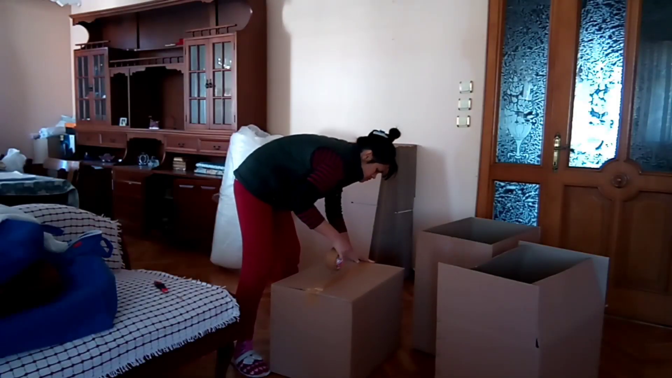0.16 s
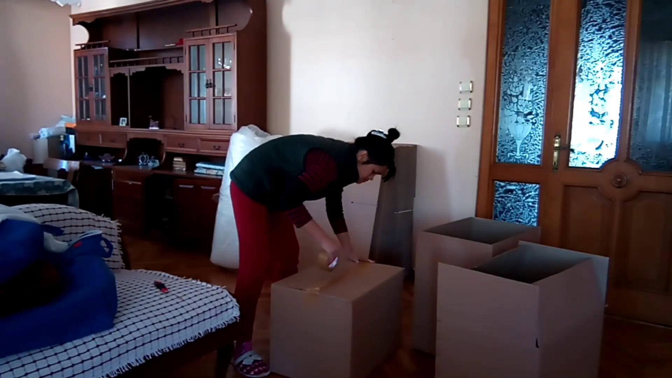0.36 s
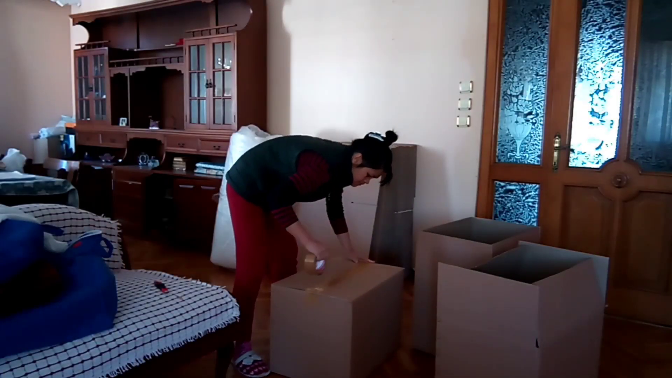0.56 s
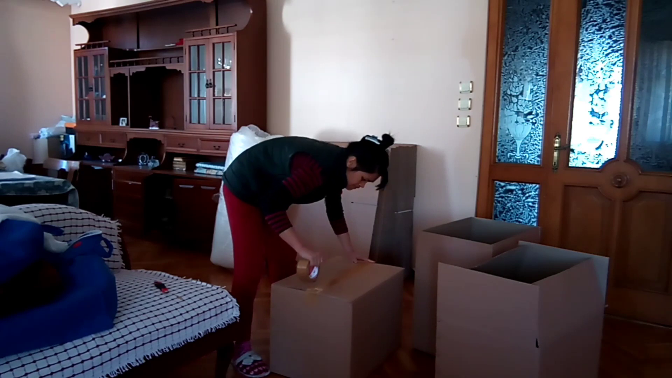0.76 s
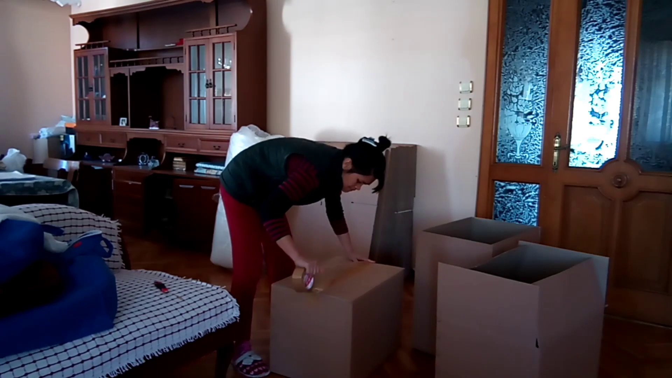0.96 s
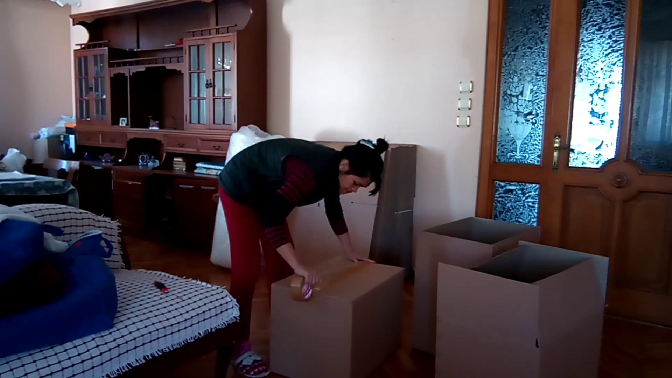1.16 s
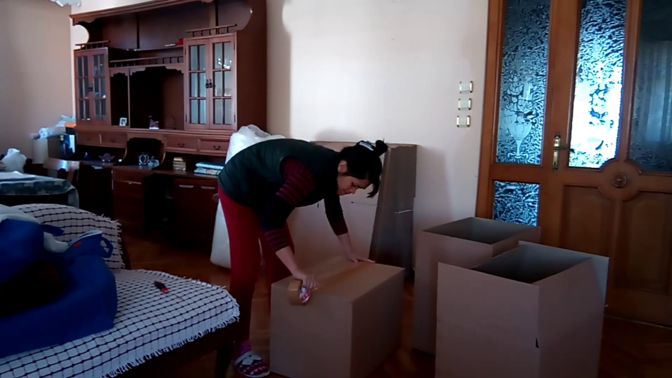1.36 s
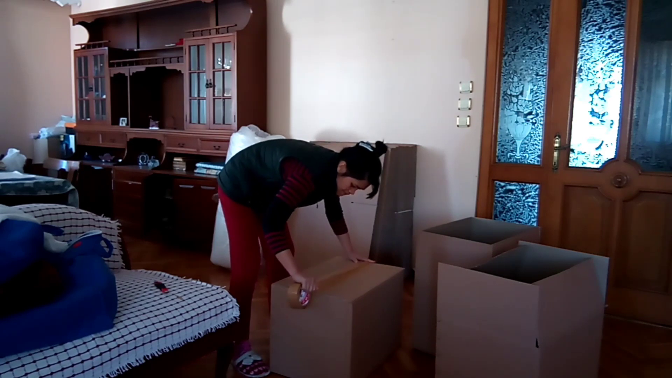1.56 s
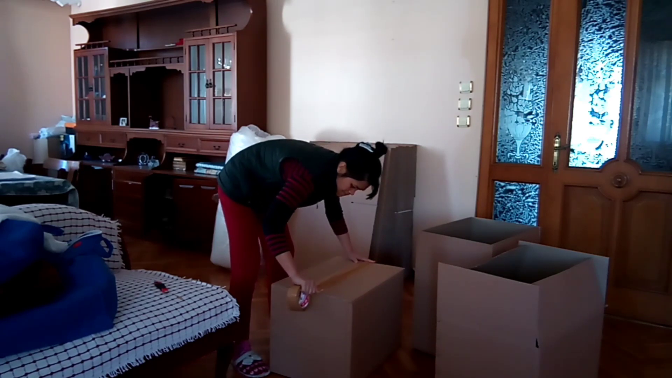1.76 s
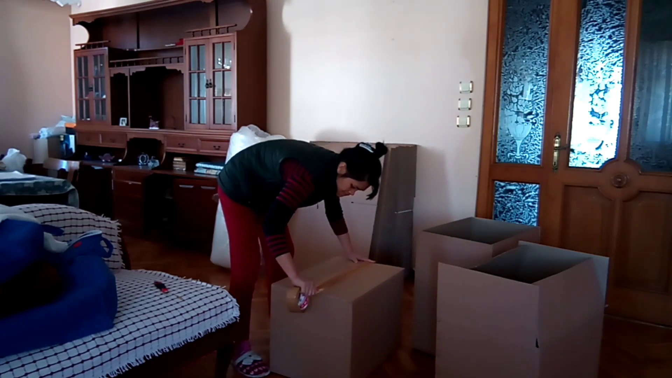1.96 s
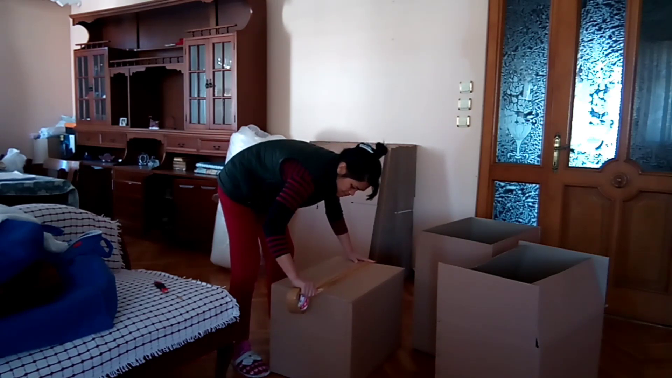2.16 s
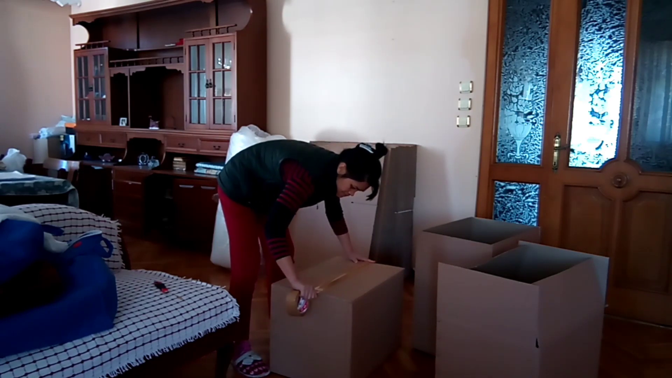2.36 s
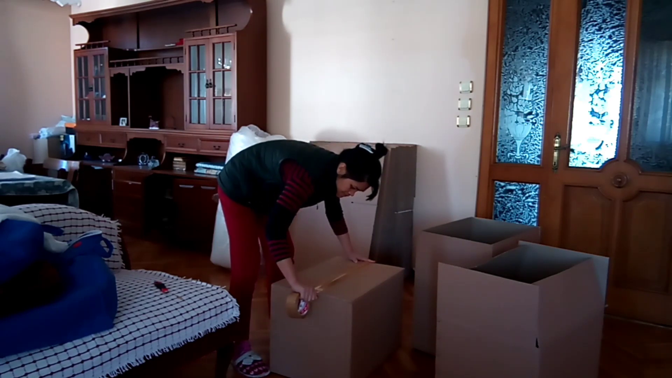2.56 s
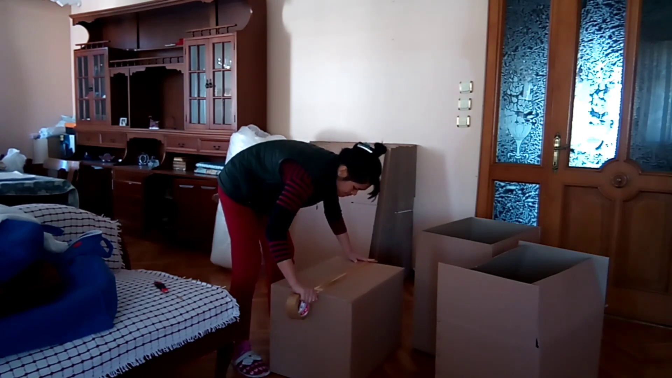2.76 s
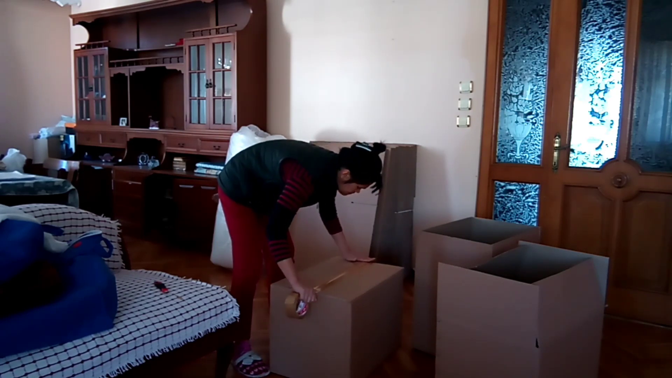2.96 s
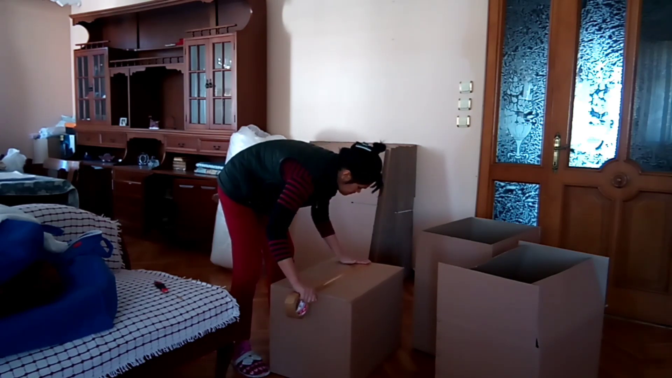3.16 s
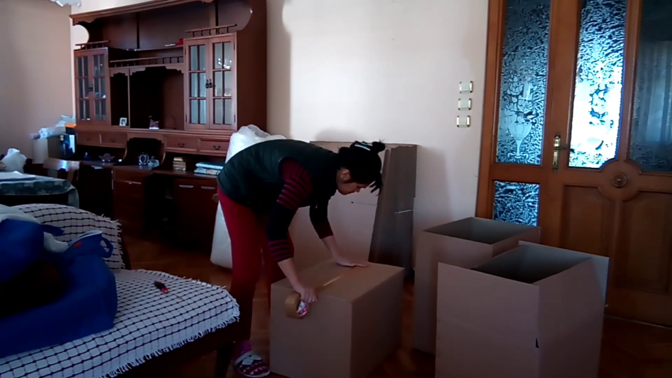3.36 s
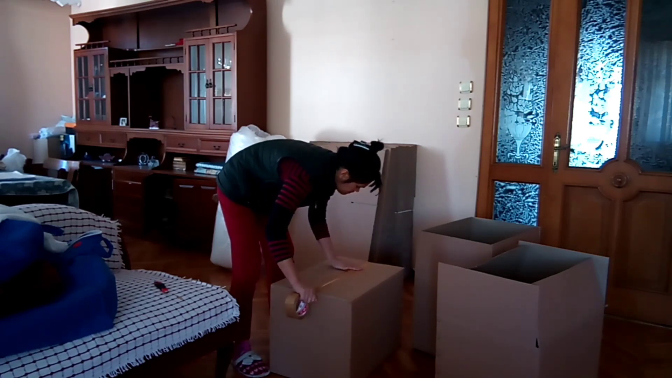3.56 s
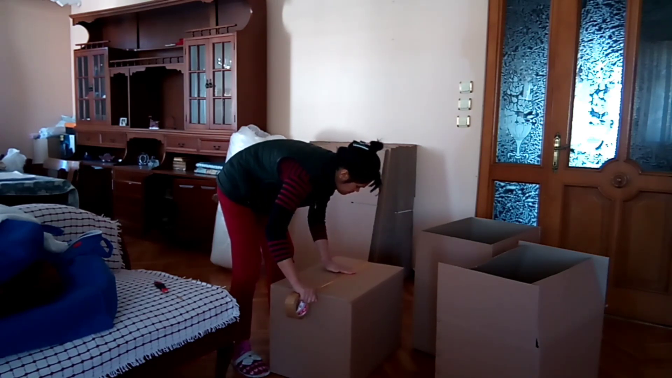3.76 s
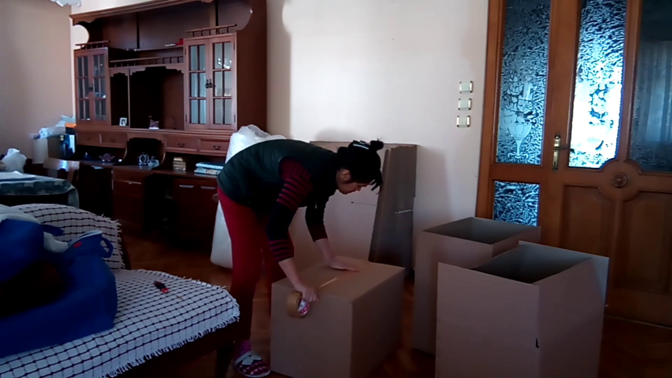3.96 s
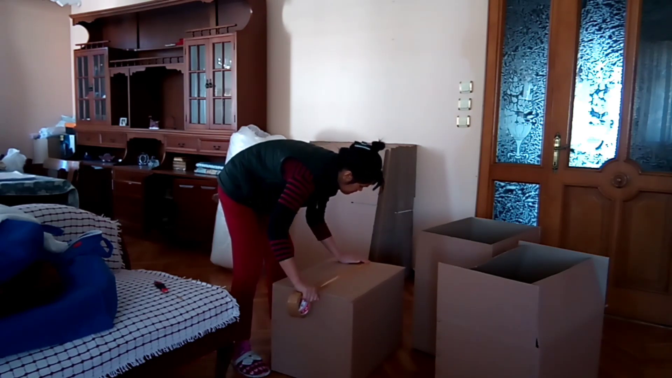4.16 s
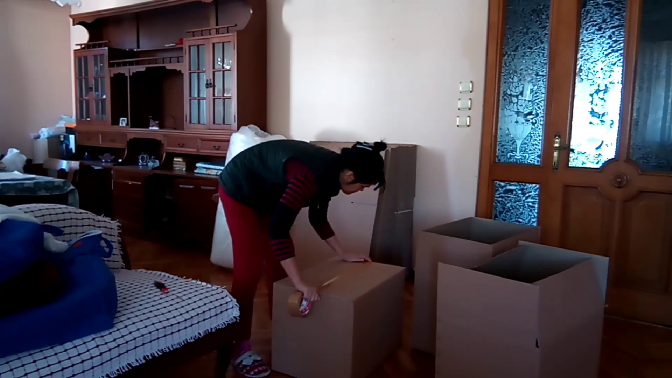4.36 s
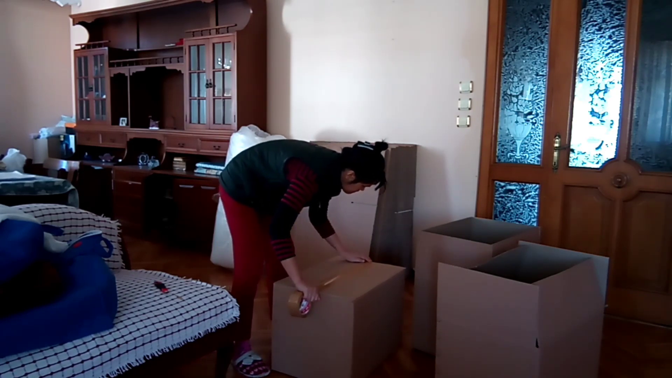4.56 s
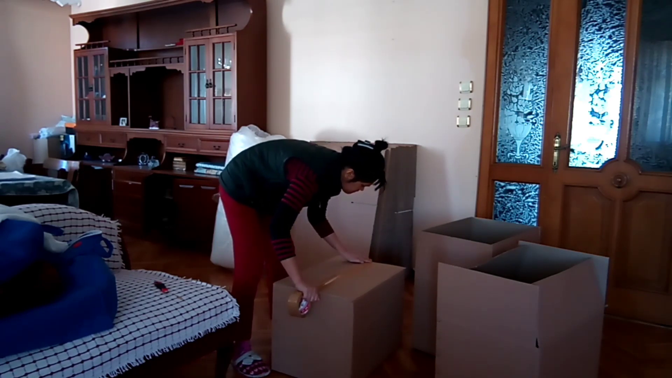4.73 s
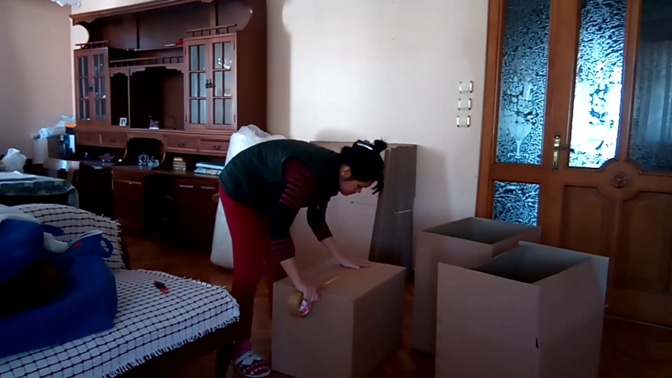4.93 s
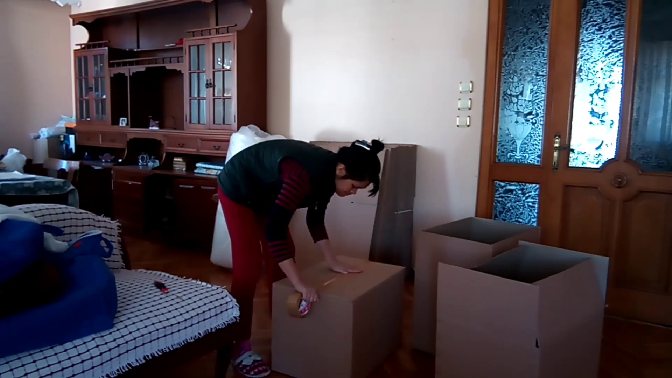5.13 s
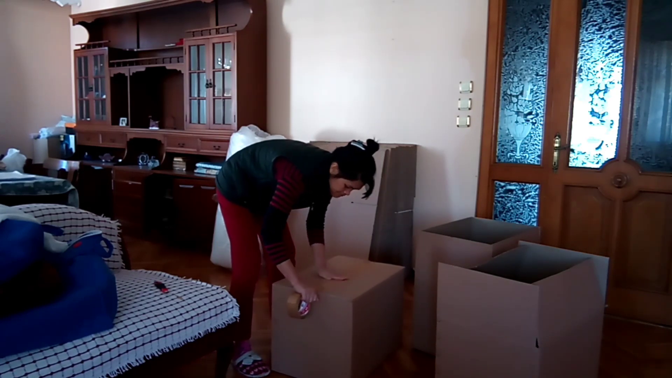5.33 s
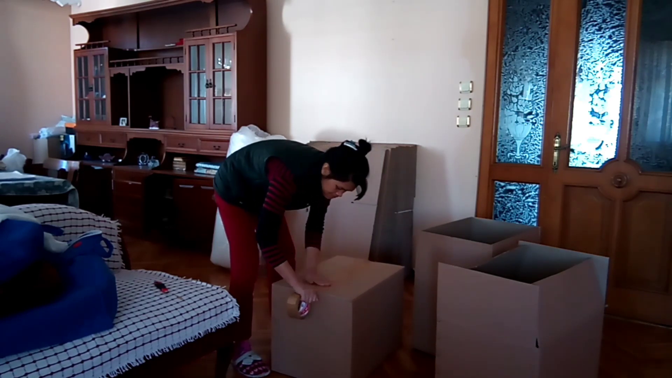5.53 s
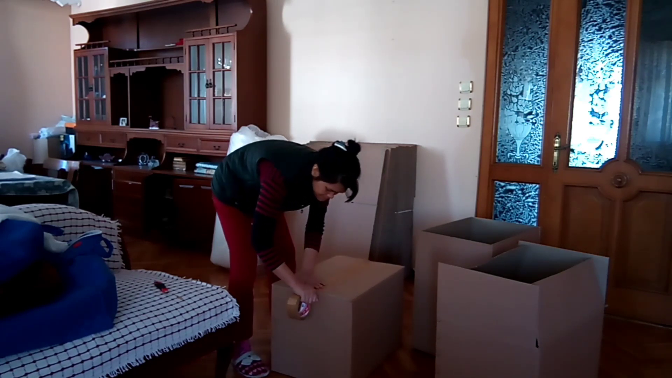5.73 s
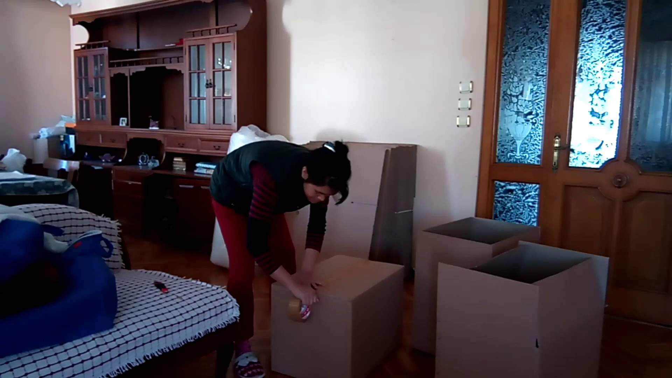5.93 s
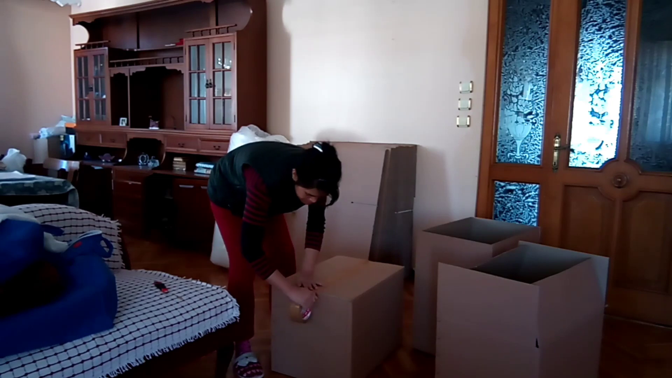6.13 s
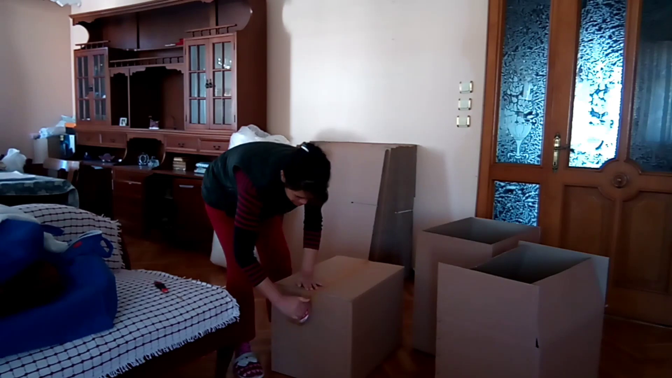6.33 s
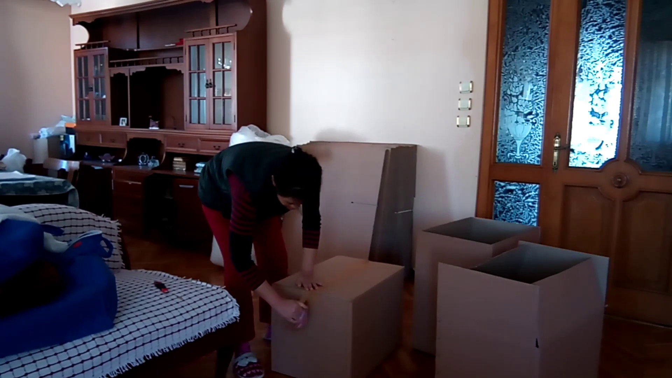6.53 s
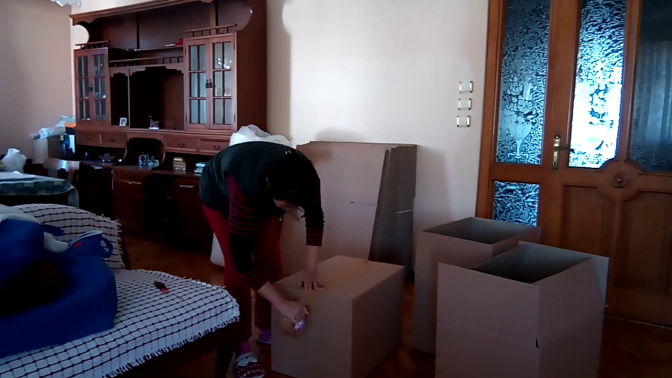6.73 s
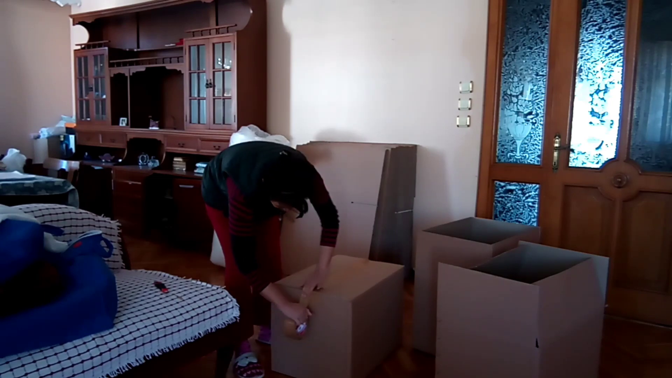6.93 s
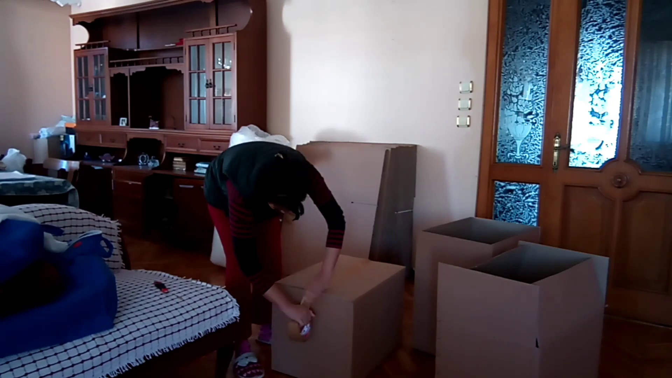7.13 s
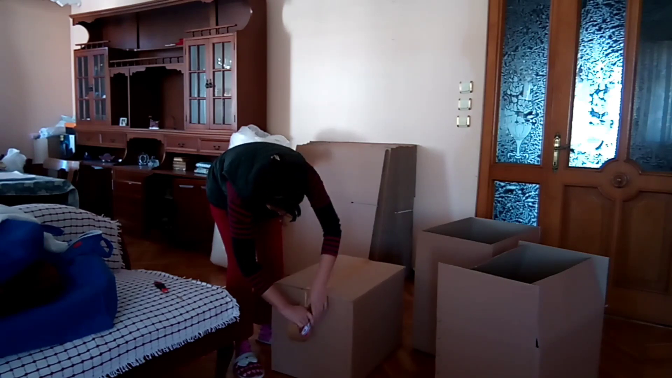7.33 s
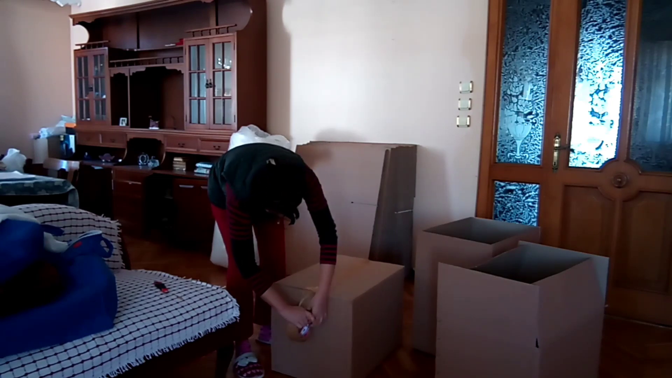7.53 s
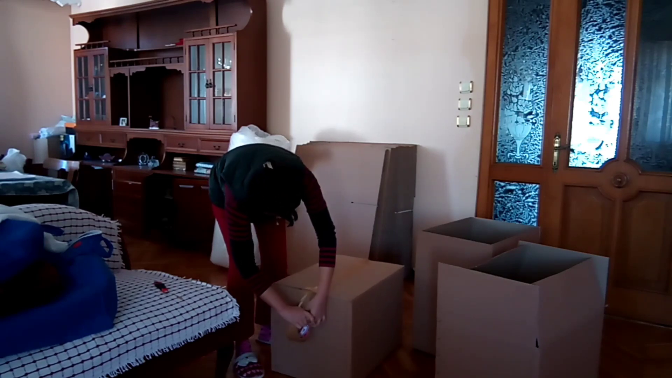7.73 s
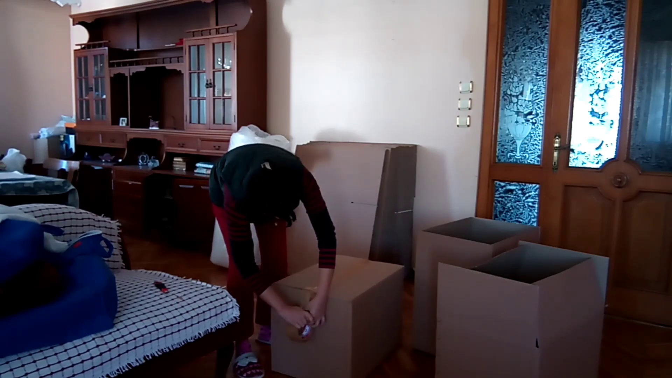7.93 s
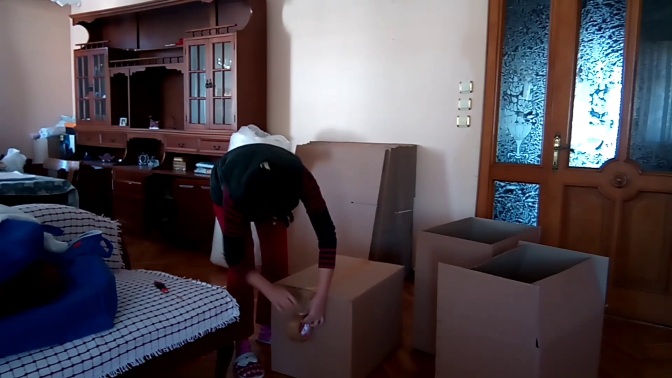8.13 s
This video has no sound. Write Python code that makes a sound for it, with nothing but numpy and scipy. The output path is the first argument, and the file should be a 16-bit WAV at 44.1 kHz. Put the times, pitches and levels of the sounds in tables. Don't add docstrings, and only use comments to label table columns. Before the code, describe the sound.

A rasping tear of packing tape over a hollow box, then quiet smoothing strokes and a burst of sharp plastic crackling in a room.

```python
import sys
import numpy as np
from scipy import signal
from scipy.fft import rfft, irfft, next_fast_len
from scipy.io import wavfile
from scipy.ndimage import uniform_filter1d, minimum_filter1d

SR = 44100
rng = np.random.default_rng(int(sys.argv[2]) if len(sys.argv) > 2 else 0)


def amp(db):
    return 10 ** (np.asarray(db, float) / 20)


def write(x):
    x = np.atleast_2d(x).T
    wavfile.write(sys.argv[1], SR, np.round(np.clip(x, -1, 1) * 32767).astype(np.int16))


N = 361042


def evened(x):
    return x / np.sqrt(np.mean(x ** 2) + 1e-20)


def read(points, hz):
    f, value = np.transpose(points)
    return np.interp(np.log(hz + 1), np.log(f + 1), value)


def shape(x, gain):
    size = next_fast_len(x.shape[-1])
    spectrum = rfft(x, size) * gain(np.fft.rfftfreq(size, 1 / SR))
    return irfft(spectrum, size)[..., :x.shape[-1]]


def colour(x, points):
    level_db = np.maximum(read(points, abs(np.fft.fftfreq(4096, 1 / SR))), -90)
    log_gain = np.log(amp(level_db))
    taps = np.fft.ifft(np.exp(np.conj(signal.hilbert(log_gain)))).real[None, :2048]
    return signal.oaconvolve(x, taps / np.linalg.norm(taps), axes=1)[:, :N]


def ring(x, modes):
    click, body = signal.unit_impulse(SR // 5), 0
    for k, (hz, width, db) in enumerate(modes):
        b, a = signal.iirpeak(hz, hz / width, SR)
        tone = signal.lfilter(b, a, signal.lfilter(b, a, click))
        body = body + (-1) ** k * amp(db) * evened(tone)
    return signal.oaconvolve(x, body[None] / np.linalg.norm(body), axes=1)[:, :N]


# f/Hz, likeness/0-1
ALIKE = [(100, 1), (300, .95), (480, .82), (750, .62), (1150, .58), (1450, .33), (2500, .22), (5000, .05)]


def pair(x):
    same = lambda hz: np.clip(read(ALIKE, hz), 0, 1)
    own = lambda hz: np.sqrt(1 - same(hz) ** 2)
    return np.array([x[0], shape(x[0], same) + shape(x[1], own)])


def bumps(rows):
    t = np.arange(0, N + 64, 64) / SR
    gain = sum(amp(db) * np.exp(-((t - s) / length) ** 2) for s, db, length in rows)
    return np.interp(np.arange(N) / SR, t, gain)


def bursts(times, levels_db, rise_ms, fall_ms):
    ms = np.arange(-200, 400) * 1000 / SR
    out = np.zeros((2, N + 600))
    swell = np.where(ms < 0, np.exp(ms / rise_ms), np.exp(-ms / fall_ms))
    for s, db, sign in zip(times, levels_db, rng.choice([-1., 1.], (len(times), 2, 600))):
        start = round(s * SR)
        out[:, start:start + 600] += amp(db) * swell * sign
    return out[:, 200:N + 200]


# delay/s, level/dB
ECHOES = [
    (0.0098, -3.5),
    (0.0233, -16.5),
]


def echoed(rows, extra_db):
    rows = np.array(rows)
    shift = lambda s, db: np.pad([s, db + extra_db], (0, rows.shape[1] - 2))
    return np.concatenate([rows] + [rows + shift(*echo) for echo in ECHOES]).T


def snaps(per_s, spread_db, burst_ms):
    starts = (rng.random(N) < per_s / SR) * amp(spread_db * np.minimum(rng.exponential(1, N), 3))
    starts /= np.sqrt(np.maximum(per_s, 1))
    u = np.arange(600) / SR / (burst_ms / 1000)
    swell = signal.oaconvolve(starts, u * np.exp(-u))[:N]
    return evened(swell * rng.standard_normal((2, N)))


def friction(gain, box_db, share, grains):
    share = np.clip(share, 0, 1)
    crackle = snaps(per_s=5000, spread_db=1.5, burst_ms=0.076)
    drive = gain * (np.sqrt(1 - share) * crackle + np.sqrt(share) * grains)
    return drive, drive * amp(box_db)


# t/s, film level/dB, box level beside film/dB, share of snaps/0-1
PULL = [
    (0.0, -38.5, -13.5, 0.17),
    (.13, -37.5, -9, 0.13),
    (.3, -37, -8, 0.05),
    (.5, -38, -6, 0.02),
    (0.598, -37.5, -11.5, 0.03),
    (.82, -33, -15, 0),
    (0.981, -37, -16, 0.08),
    (1.086, -45, -12.5, 1),
    (1.444, -45, -13.5, 0.35),
    (1.6, -86, -8, 0),
]
# t of deepest sag/s, depth/dB, time to sink/s
CATCHES = [
    (.2, 0, 0.052),
    (0.336, 11.5, 0.028),
    (0.406, 10, 0.027),
    (0.504, 16, 0.011),
    (.64, 1.5, 0.037),
    (0.747, 20, 0.022),
    (0.79, 6, 0.025),
    (0.827, 12.5, 0.017),
    (.944, 4.5, 0.12),
]


def pull():
    free_s, box_holds, snaps_per_db = 0.0067, 0.55, -0.7
    t = np.arange(N) / SR
    s, *columns = np.transpose(PULL)
    db, box_db, share = (np.interp(t, s, c) for c in columns)
    sag_db = sum(depth_db * np.interp(t, [at - sink, at, at + free_s], [0, 1, 0])
                 for at, depth_db, sink in CATCHES)
    gain = amp(db - sag_db) * (t < s[-1])
    grains = snaps(per_s=460, spread_db=2.5, burst_ms=0.7)
    return friction(gain, box_db + box_holds * sag_db, share + snaps_per_db * sag_db, grains)


# t/s, level/dB
RUMBLE = [(0.0, -54.5), (.18, -66.5), (.41, -59.5), (1.3, -74.5), (1.52, -66), (2.3, -73.5), (2.63, -71),
          (3.06, -73.5), (3.19, -63), (3.44, -75), (3.9, -64), (4.13, -62.5), (4.35, -65.5), (5.1, -62.5),
          (5.4, -65.5), (6.14, -62), (7.6, -63.5), (8.14, -60.5)]
# f/Hz, width/Hz, level/dB
ROOM_MODES = [(99.4, 14, 0), (140.6, 15, 0)]
# t/s, lower over upper/dB
MODE_TILT = [(0, 1), (2.6, -3.5), (3.5, -3), (4.15, -1), (4.5, -3), (5.2, 0.5), (5.5, 2), (7.3, 2),
             (8.19, 2.5)]
# f/Hz, width/Hz, level/dB
LOW_MODE = [(60.4, 31, 0)]
WALLS = [(188.6, 63, -11), (308, 168, -15.5)]
# t/s, level/dB, length/s
THUMPS = [
    (1.66, -68, 0.18),
    (2.25, -72, 0.09),
    (2.95, -78.5, 0.13),
    (3.717, -93, 0.18),
    (6.402, -76, 0.061),
    (7.7, -77, 0.22),
]
# t/s, level/dB, length/s
PRESSES = [
    (.25, -60.5, 0.34),
    (1.68, -74.5, 0.1),
    (2.74, -66, 0.052),
    (6.45, -51, 0.066),
    (6.8, -66.5, 0.17),
    (7.36, -62.5, 0.054),
]


def rumble(force):
    t = np.arange(N) / SR
    boom = amp(-22) * abs(uniform_filter1d(force, round(0.042 * SR))) ** (0.77 / 2)
    tilt = amp(np.interp(t, *np.transpose(MODE_TILT)))
    a, b, c = rng.standard_normal((3, 2, N))
    swells_db = 2.2 * evened(uniform_filter1d(rng.standard_normal(N), size=3500))
    hum = amp(np.interp(t, *np.transpose(RUMBLE)) + swells_db)
    modes = hum * (tilt * ring(a, ROOM_MODES[:1]) + ring(a, ROOM_MODES[1:]) / tilt) / np.sqrt(2)
    deep = (amp(-16.5) * hum + bumps(THUMPS) + amp(-9) * boom) * ring(b, LOW_MODE)
    walls = (amp(-26) * hum + boom + bumps(PRESSES)) * ring(c, WALLS)
    mains = amp(-16.5) * hum * np.sin(2 * np.pi * 100.6 * t)
    return modes + deep + walls + mains


# f/Hz, level/dB
AIR = [(130, -31.5), (220, -3.5), (245, -13), (321, -8), (405, -10.5), (443, -11), (693, -15), (845, -21.5),
       (1070, -22.5), (1450, -21), (1670, -17), (1830, -21.5), (13500, -36), (15000, -34)]


def air(noise):
    return amp(-80.5 + 5.5) * colour(noise, AIR)


# f/Hz, width/Hz, level/dB
WHINE = [(4008, 12, -98), (1850, 260, -99.5)]
# t/s, level/dB, length/s
WHINE_SWELL = (7.9, -85.5, .27)
# t/s, level/dB, length/s
WHISTLES = [
    (2.08, -93, .08),
    (2.29, -91, .07),
    (4.41, -90, .03),
    (4.66, -89, .05),
    (4.79, -89, .035),
]


def whine(noise):
    high, low = WHINE
    t = np.arange(N) / SR
    blurred = amp(high[2]) * ring(noise, [high])
    blurred = blurred + (amp(low[2]) + bumps([WHINE_SWELL])) * ring(noise, [low])
    return blurred + bumps(WHISTLES) * np.sin(2 * np.pi * high[0] * t)


def house(force):
    noise = rng.standard_normal((2, N))
    low = rumble(force) + amp(-1.5) * engine() + drums()
    sides_db = np.array([[-1.5], [1.5]])
    return pair(amp(-0.5) * low + air(noise) + whine(noise)) * amp(sides_db)


# t/s, level/dB
TEARS = [(.0635, -37), (.1593, -32.5), (.2479, -27), (.2803, -20), (.3594, -17), (.4286, -28), (.4726, -23),
         (.5261, -54), (.6699, -29), (.7106, -47), (.7561, -26), (.819, -37), (.842, -17), (.8551, -36),
         (.8656, -40), (.9136, -22), (.9275, -56), (.9627, -19.5), (1.0335, -30), (1.0523, -30.5),
         (1.104, -25.5), (1.1557, -20.5), (1.1968, -29), (1.2368, -23.5), (1.2874, -27.5), (1.3206, -32.5),
         (1.3449, -25), (.8312, -22), (.8768, -20), (.974, -22), (1.0623, -23), (1.3987, -31.5),
         (1.4389, -29)]
# f/Hz, level/dB
SLIP = [(300, -53.5), (1500, -5), (4000, -2), (6500, 9), (8800, 9.5), (11000, -2.5), (13400, -1.5),
        (15000, 10), (15600, 13), (16000, 6)]


def tears(crack):
    s, db = echoed(TEARS, -1.0)
    slips = bursts(s, db - 7, rise_ms=1.0, fall_ms=1.2)
    slips += amp(3) * bursts(*echoed(TEARS, 2), rise_ms=.04, fall_ms=.07)
    slips += amp(-6) * bursts(*np.transpose(CRACKS)[:2], rise_ms=.04, fall_ms=.1)
    return colour(slips + amp(-12.5) * crack, SLIP)


# t/s, level/dB, length/s, f/Hz
DRUMS = [(.2, -57, 0.091, 195), (0.528, -52, 0.066, 207.5), (0.686, -55, 0.042, 197),
         (2.372, -63, 0.014, 314), (2.705, -67, 0.017, 198), (7.17, -60, 0.028, 187),
         (7.22, -57, 0.027, 202), (2.425, -66, 0.038, 299), (2.53, -70, 0.039, 248),
         (2.75, -66.5, 0.048, 211), (3.305, -76.5, .04, 595), (4.248, -69, 0.021, 623),
         (6.061, -68, 0.031, 195), (6.127, -67.5, .03, 287.6), (6.2, -64, 0.037, 204),
         (6.299, -62, 0.031, 206), (6.396, -59, 0.025, 330), (6.47, -45, 0.02, 206),
         (6.578, -52, 0.058, 274.4), (6.715, -50, 0.012, 210)]


def drums():
    out = np.zeros(N + SR)
    for s, db, length, hz in DRUMS:
        t = np.arange(max(-s, -3 * length), 3 * length, 1 / SR)
        at = round((s + t[0]) * SR)
        out[at:at + len(t)] += amp(db) * np.exp(-(t / length) ** 2) * np.sin(2 * np.pi * hz * t)
    return out[:N]


# f/Hz, level/dB
FILM = [(760, -20.5), (1300, -3.5), (1620, -4.5), (2130, -1.5), (2600, 2), (3170, 2.5), (3920, 1.5),
        (6480, 4.5), (8000, 2), (8700, 4.5), (10800, -2.5), (13400, -6.5), (15000, 6.5), (15500, 5.5),
        (16000, -31)]


def film_body(drive):
    return amp(-1.5) * colour(drive, FILM)


# f/Hz, level/dB
BOX = [(100, -69), (250, -47.5), (450, 1.5), (560, -2), (630, 6.5), (720, 3), (1000, 0), (1220, -0.5),
       (1500, -5), (2100, -3), (3000, -13)]
# f/Hz, width/Hz, level/dB
PANELS = [(613.5, 38, 4), (689.6, 17, -3.5), (840, 17, -4.5), (967, 29, -1), (1053, 47, -6), (1213, 18, 2),
          (1792, 71, -3.5), (2170, 24, -5.5)]


def box_body(drive):
    return amp(1.0) * (colour(drive, BOX) + amp(-9) * ring(drive, PANELS))


# t/s, f/Hz, level/dB
SQUEAK = [
    (1.64, 1585, -80),
    (1.652, 1575, -67),
    (1.69, 1560, -66),
    (1.72, 1550, -72),
    (1.79, 1546, -75),
    (1.82, 1545, -81),
    (1.9, 1550, -83),
    (1.97, 1545, -90),
]
# multiple of the pitch, level/dB
OVERTONES = [(1, 1), (2, 1), (3, -1), (4, -5), (5, -14), (6, -13)]


def squeak():
    s, hz, db = np.transpose(SQUEAK)
    t = np.arange(2 * SR) / SR
    waver, flutter_db = (evened(uniform_filter1d(v, 300)) for v in rng.standard_normal((2, len(t))))
    turn = 2 * np.pi * np.cumsum(np.interp(t, s, hz) * (1 + .008 * waver)) / SR
    flutter = amp(2.6 * flutter_db)
    dull_db = 34 * np.clip(t - s[2], -.02, .15)
    tone = 0
    for k, level_db in OVERTONES:
        strength = amp(level_db - (k - 1.5) * dull_db) * np.roll(flutter, 900 * k)
        tone = tone + strength * np.sin(k * turn)
    tone = flutter * tone
    scrape_modes = [(2880, 750, 5.0), (4770, 1900, 3.0), (370, 430, -0.5)]  # f/Hz, width/Hz, level/dB
    scrape = ring(rng.standard_normal((2, len(t))), scrape_modes)[:, :len(t)]
    contact = uniform_filter1d(1. * ((t > s[0]) & (t < s[-1])), 300)
    sound = amp(np.interp(t, s, db)) * contact * (tone + amp(2.0 - dull_db) * scrape)
    return np.pad(sound, ((0, 0), (0, N - len(t))))


def movement(start, end, start_db, end_db, rise, fall, box_db, share, sizzle_db, lean_db):
    span_db, rounding, slack = 43, 1.536, 0.29
    t = np.arange(0, N + 64, 64) / SR
    rise_db = span_db * (np.maximum(start - t, 0) / rise) ** rounding
    fall_db = span_db * (np.maximum(t - end, 0) / fall) ** rounding
    db = np.interp(t, [start, end + 1e-6], [start_db, end_db]) - rise_db
    power = amp(np.maximum(db - fall_db, -200)) ** 2
    parts = [1, amp(box_db) ** 2, share, amp(sizzle_db - slack * fall_db) ** 2, amp(lean_db) ** 2]
    return np.array([power * part for part in parts])


# t of peak/s, film level/dB, rise/s, fall/s, box beside film/dB
CRINKLES = [(1.83, -58, 0.0092, 0.16, -16), (2.372, -47.5, 0.011, 0.22, -8),
            (2.48, -48.5, 0.024, 0.13, -13.5), (2.684, -52, 0.01, 0.11, -10),
            (3.939, -49, 0.013, 0.31, -41), (3.987, -50, 0.013, 0.23, -14.5),
            (4.578, -81, 0.024, 0.89, -34), (6.272, -36.5, 0.0015, 0.16, -29),
            (6.294, -37, 0.03, 0.045, -12.5), (6.37, -37, 0.074, 0.099, -26),
            (6.42, -30.5, 0.15, 0.14, -21), (6.538, -37.5, 0.002, 0.26, -33.5),
            (6.552, -30.5, .03, 0.27, -29), (6.591, -29, 0.081, 0.24, -19.5), (6.9, -56, 0.14, 0.3, -44),
            (7.111, -52, 0.0064, .1, -31), (7.123, -43.5, 0.0045, 0.094, -36),
            (7.166, -36.5, 0.075, 0.11, -16.5), (7.278, -47.5, 0.041, 0.23, -21),
            (7.52, -67, 0.28, 0.23, -31), (8.061, -64.5, 0.017, 0.16, -25)]
SCUFFS = [
    (2.76, -70, 0.045, 1, -7),
    (2.894, -64, 0.036, 0.23, -27),
    (5.816, -58, 0.019, 0.21, -26),
    (5.96, -47.5, 0.16, 0.091, -26),
    (6.06, -38.5, 0.13, .13, -20),
    (7.598, -59, .003, 0.21, -29),
    (7.785, -60.5, 0.0055, 0.18, -29),
]
# start t/s, end t/s, film level at start/dB, at end/dB
STROKES = [
    (3.02, 3.246, -60, -59.5),
    (3.352, 3.525, -69, -64),
    (3.602, 3.827, -59, -59.5),
    (4.128, 4.285, -54, -61.5),
    (4.94, 5.518, -59, -52),
    (5.601, 5.806, -54, -61),
]


def movements():
    power = 0
    for rows, sizzle_db in [(CRINKLES, -6), (SCUFFS, -11)]:
        for s, db, rise, fall, box_db in rows:
            power = power + movement(s, s, db, db, rise, fall, box_db, share=0.34, sizzle_db=sizzle_db, lean_db=0)
    for row in STROKES:
        power = power + movement(*row, rise=0.19, fall=0.24, box_db=-30.5, share=0.056,
                                 sizzle_db=-7.5, lean_db=-3.5)
    film, box, snap, top, low = (np.interp(np.arange(N), np.arange(len(p)) * 64, p) + 1e-30 for p in power)
    return np.sqrt(film), 10 * np.log10(box / film), snap / film, np.sqrt(top / film), np.sqrt(low / film)


# f/Hz, width/Hz, level/dB
TAUT = [(3225, 700, -1), (6600, 350, 3), (8720, 700, -3)]


def hand():
    gain, box_db, share, sizzle, lean = movements()
    gain *= amp(0.75 * evened(uniform_filter1d(rng.standard_normal(N), 1200)))
    film, box = friction(gain, box_db, share, snaps(per_s=390, spread_db=2, burst_ms=0.2))
    top = shape(film, lambda hz: np.clip((hz - 10000) / 1500, 0, 1))
    low = shape(film, lambda hz: np.clip((3360 - hz) / 1200 + .5, 0, 1))
    taut = np.clip((20 * np.log10(gain) + 50) / 12, 0, 1)
    film = film * amp(-2.5 * taut) + amp(-15) * ring(film * taut, TAUT)
    return film + (amp(6.0) * sizzle - 1) * top + (lean - 1) * low, box


# t/s, film level/dB, knock beside film/dB
CRACKS = [(1.8293, -38.5, -14.5), (1.838, -43, -22), (1.8876, -37, -16.5), (2.365, -24.5, -4.5),
          (2.417, -29.5, -9), (2.4687, -28.5, -7.5), (2.673, -49, -30), (2.6801, -35.5, -12.5),
          (2.687, -38, -3), (3.5818, -41, -44), (3.9404, -38, -32), (3.9882, -26.5, -13.5),
          (4.572, -53.5, -44), (5.8175, -35.5, -26), (5.8837, -26.5, -24), (5.9253, -24, -15.5),
          (5.9621, -41, -33), (5.9695, -26, -20), (5.982, -31, -32), (6.01, -19, -37), (6.2712, -24.5, -45),
          (6.2765, -32, -32), (6.289, -33, -25), (6.2955, -22, -10.5), (6.3594, -26, -35),
          (6.3715, -36.5, -16), (6.381, -21, -31), (6.411, -26, -25), (6.413, -20, -35), (6.4235, -18, -36),
          (6.427, -29, -23.5), (6.5359, -17.5, -19.5), (6.543, -39.5, -29.5), (6.564, -19.5, -26),
          (6.598, -17.5, -23), (6.8025, -35, -20), (6.844, -39, -27), (6.861, -44, -52.5),
          (6.875, -35.5, -37), (6.8812, -38, -37.5), (6.912, -33.5, -39), (6.93, -43, -39),
          (6.959, -36.5, -42), (7.109, -36, -29), (7.12, -25.5, -18), (7.1382, -20.5, -22),
          (7.153, -21, -30), (7.172, -27, -19), (7.184, -25.5, -24), (7.2735, -28.5, -17),
          (7.288, -35.5, -5), (7.3174, -28, -13), (7.4904, -43, -32), (7.5974, -38.5, -46),
          (7.612, -45, -25), (7.7872, -38.5, -35), (8.0642, -40.5, -21)]
# f/Hz, width/Hz, level/dB
KNOCK = [(576, 160, -11), (1153, 980, -2.5), (2420, 410, -5.5)]


def cracks():
    s, db, knock_db = echoed(CRACKS, -5.5)
    blows = np.zeros((2, N))
    blows[:, (s * SR).astype(int)] = amp(db + knock_db + 12.0)
    return bursts(s, db - 9.0, rise_ms=0.07, fall_ms=1.98), ring(blows, KNOCK)


# t/s, firing f/Hz, level/dB
ENGINE = [
    (4.3, 52.5, -73),
    (4.44, 52.7, -76.5),
    (4.81, 54.3, -66.5),
    (6.07, 70, -64),
    (6.4, 64.8, -65),
    (6.54, 61.5, -73),
    (6.9, 57, -84),
]


def engine():
    t = np.arange(N) / SR
    s, hz, db = np.transpose(ENGINE)
    waver, throb_db = (evened(uniform_filter1d(v, 4000)) for v in rng.standard_normal((2, N)))
    turn = 2 * np.pi * np.cumsum(np.interp(t, s, hz) * (1 + 0.035 * waver)) / SR
    on = uniform_filter1d(1. * ((t > s[0]) & (t < s[-1])), size=8000)
    return np.sqrt(2) * on * amp(np.interp(t, s, db) + 3 * throb_db) * np.sin(turn)


# f/Hz, time to fall 60 dB/s
ROOM = [(200, 0.83), (1000, 0.46), (4000, 0.39), (9000, 0.27), (15000, 0.2)]


def room(x, wet_db):
    out = x.copy()
    turn = np.pi * np.arange(N) / SR / .21
    for k in range(3):
        taps = np.zeros((2, SR // 2))
        at = np.arange(100, SR // 2 - 20, 20) + rng.integers(0, 20, (2, (SR // 2 - 101) // 20))
        np.put_along_axis(taps, at, rng.choice([-1., 1.], at.shape), 1)
        hz, t, z = signal.stft(taps, SR, nperseg=256)
        fading = z * amp(-60 * t / read(ROOM, hz)[:, None])
        tail = pair(signal.istft(fading, SR, nperseg=256)[1])
        fed = x[0] * np.sqrt(2 / 3) * np.cos(turn + k * np.pi / 3)
        out += amp(wet_db) * signal.oaconvolve(fed[None], tail / np.linalg.norm(tail[0]), axes=1)[:, :N]
    return out / np.sqrt(1 + amp(wet_db) ** 2)


# f/Hz, left minus right level/dB
SIDES = [(200, -1), (1000, -3.5), (2600, -2.5), (4000, -2), (5500, -3), (7200, -7.5), (9000, -6.5),
         (10500, -2), (12000, -35), (13500, -33), (14800, -54)]


def sides(x):
    left = lambda hz: amp(read(SIDES, hz)) ** 2
    return shape(x, lambda hz: 2 * np.sqrt(np.array([left(hz), 1 + 0 * hz]) / (1 + left(hz))))


def scene():
    film, box = np.add(pull(), hand())
    crack, knock = cracks()
    sharp = pair(tears(crack)) + knock
    near = pair(film_body(film + crack) + box_body(box) + squeak())
    heard = room(near + amp(-4.5) * sharp, wet_db=-4.0) + amp(-13.0) * sharp
    force = abs(film * box).mean(0)
    return sides(heard) + house(force)


def ducked(x):
    ahead_s, jump_db, duck, loud_db = .012, 11, 1.4, -52
    db = 10 * np.log10(abs(uniform_filter1d((np.diff(x, prepend=0) ** 2).mean(0), size=130)) + 1e-14)
    size = round(ahead_s * SR)
    ahead_db = -minimum_filter1d(-db, size, origin=-(size // 2))
    top = shape(x, lambda hz: np.clip((hz - 8500) / 2000, 0, 1))
    loud = np.clip((ahead_db - loud_db) / 10, 0, 1)
    cut_db = duck * loud * np.maximum(ahead_db - db - jump_db, 0)
    return x - top + top / amp(uniform_filter1d(cut_db, size=40))


def starved(x, edge_hz, top_hz, quiet_db, under_db, luck_db, rare):
    hz, t, z = signal.stft(x, SR, nperseg=1024)
    hz = hz[:512, None]
    power = uniform_filter1d(abs(z[:, :512]) ** 2, size=3, axis=2) + 1e-20
    middle = power[:, 70:210].mean(axis=(0, 1)) + amp(quiet_db) ** 2
    bands = power.reshape(2, 128, 4, -1).mean(2)
    luck = evened(uniform_filter1d(rng.standard_normal(bands.shape[1:]), size=6, axis=1))
    faint = (bands < middle * amp(under_db + luck_db * luck) ** 2) & (luck > .35)
    weak = faint.repeat(4, 1) & (hz > edge_hz) & (hz < 14300)
    miss = evened(uniform_filter1d(rng.standard_normal((128, len(t))), size=6, axis=1))
    miss = miss.repeat(6, 0)[:512]
    weak |= (miss > rare + 2.4 * abs(np.log2((hz + 1) / 3400)))
    z[:, :512] *= np.where(weak, 0, np.where(hz > top_hz, amp(-31), 1))
    return signal.istft(z, SR, nperseg=1024)[1][:, :N]


def top_cut(x):
    return signal.sosfilt(signal.butter(12, 16520, fs=SR, output="sos"), x)


def record(dry):
    late = np.array([dry[0], np.roll(dry[1], 41)])
    thinned = starved(ducked(late), edge_hz=9300, top_hz=15600, quiet_db=-86, under_db=-16, luck_db=3, rare=.9)
    return top_cut(thinned)


dry = scene()
out = record(dry)
write(out)
```